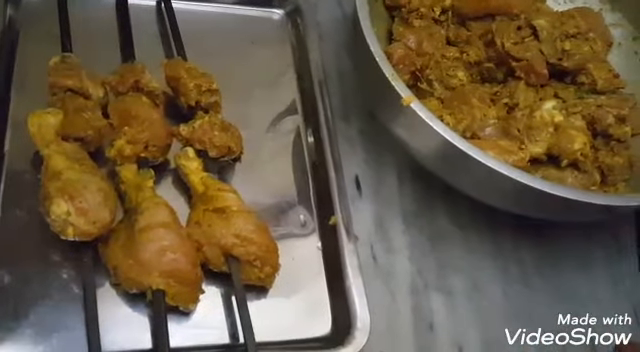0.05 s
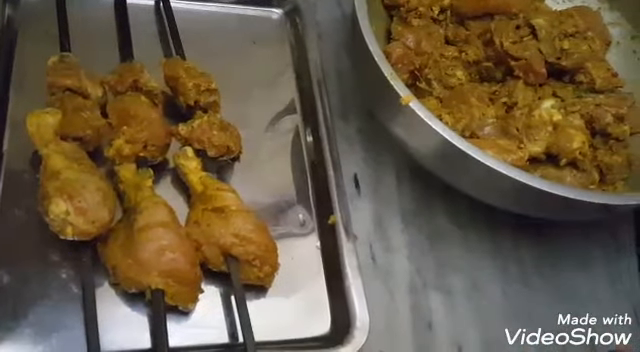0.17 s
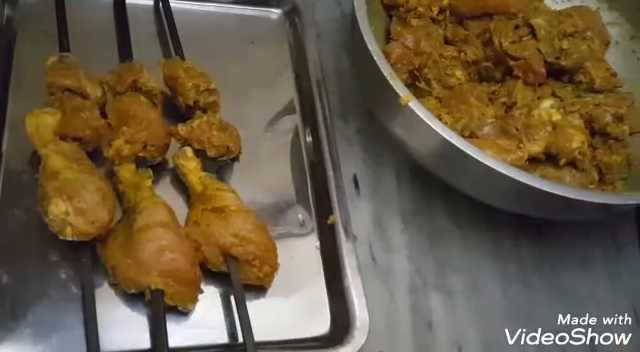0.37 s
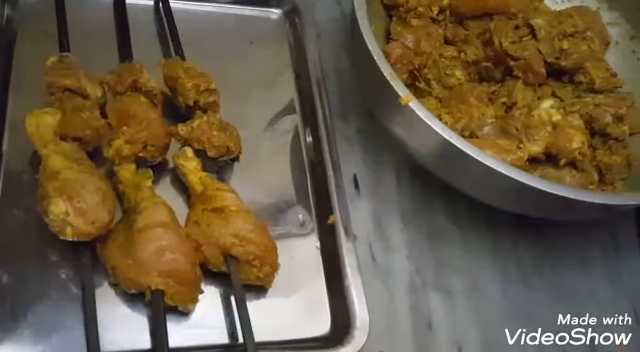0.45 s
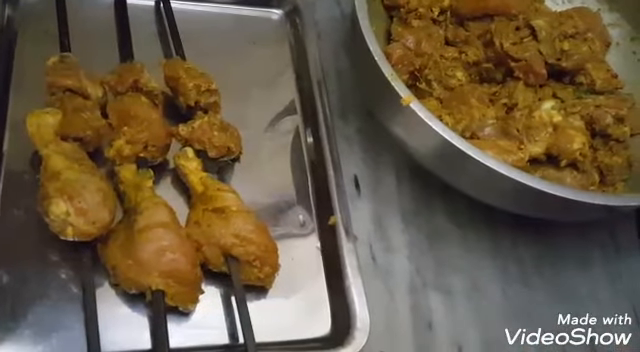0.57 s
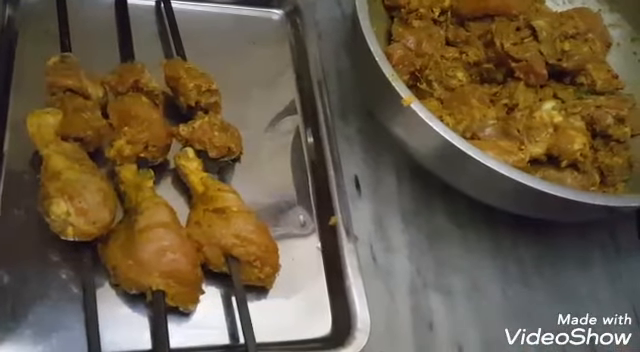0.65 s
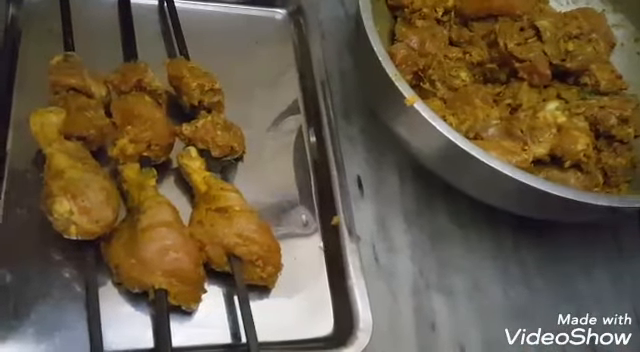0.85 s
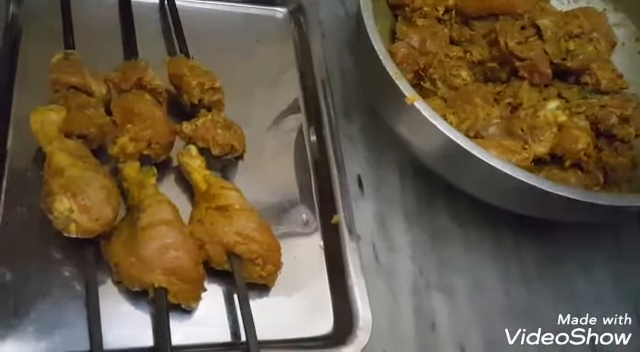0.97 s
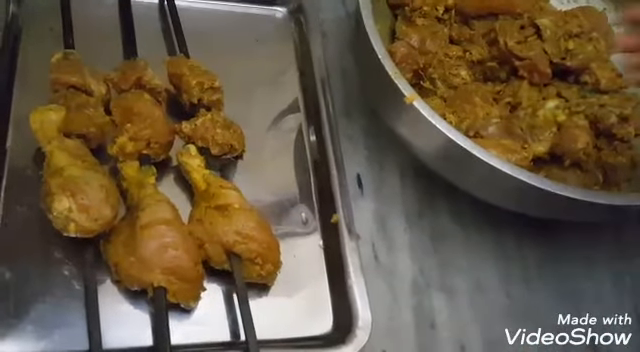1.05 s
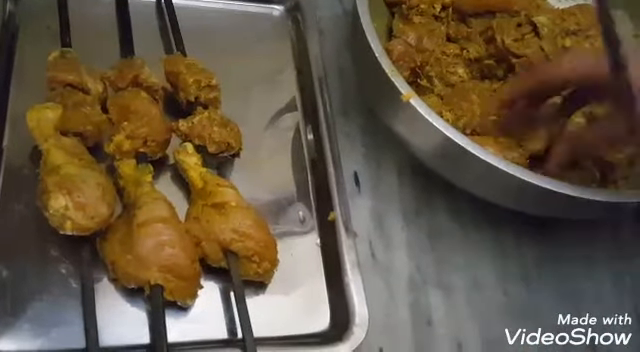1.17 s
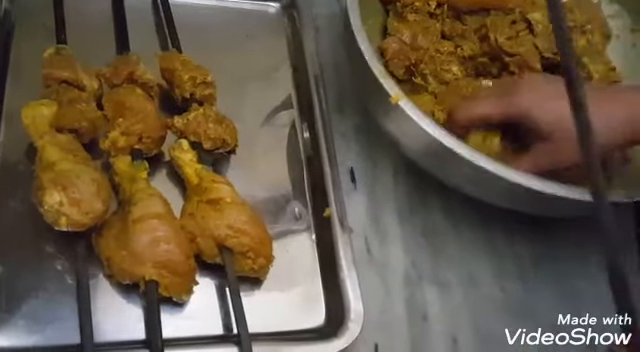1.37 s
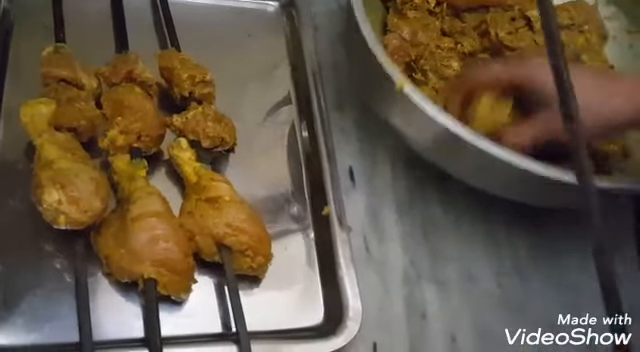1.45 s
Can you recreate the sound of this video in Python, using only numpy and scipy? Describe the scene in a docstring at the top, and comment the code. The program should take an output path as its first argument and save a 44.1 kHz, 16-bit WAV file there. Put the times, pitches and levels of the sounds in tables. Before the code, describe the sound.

Metal skewers scrape and clink in two quick ringing pairs, then a steel tray is bumped and knocked hard, rattling on the counter; a faint tick and soft wet rubbing follow, close-miked in a hard-walled kitchen.

```python
"""Steel skewers and a tray in a hard-walled kitchen

One skewer scrapes along the others and clinks in two quick pairs. A steel tray is bumped, which makes a loaded
skewer jump, then knocked hard so that it rattles on the counter. A skewer tip ticks, and a hand rubs and
squishes in a bowl of marinated meat over a faint hum. Steel is banks of decaying, wavering modes plus noise
washes; scraping and rubbing are shaped noise bursts; pushes into the counter are short low sines.
"""
import sys
import numpy as np
from scipy import signal
from scipy.fft import rfft, irfft, next_fast_len
from scipy.io import wavfile

SR = 44100
rng = np.random.default_rng(int(sys.argv[2]) if len(sys.argv) > 2 else 0)


def waveform_to_disk(signal):
    """Save audio, clipped to [-1, 1], as 16-bit WAV at the path in sys.argv[1]."""
    frames = np.transpose(np.atleast_2d(signal))
    scaled = np.clip(frames, -1, 1) * 32767
    samples = np.round(scaled).astype(np.int16)
    wavfile.write(sys.argv[1], SR, samples)


N = 66150

# likeness of left and right: f/Hz, correlation
LIKENESS = [(60, 0.83), (200, 0.98), (400, .8), (750, 0.74), (1300, -0.25), (2500, -0.077), (15000, .05)]
# ringing modes of the skewers: f/Hz, relative level/dB
SKEWER_MODES = [(3553, -45), (4517, -39.5), (5050, -50), (5448, -53), (5523, -48.5), (5577, -46),
                (5932, -56), (6320, -60), (6401, -62), (6589, -41.5), (6729, -37), (6885, -44), (7074, -58),
                (7795, -38.5), (7876, -40), (7951, -41), (8387, -51.5), (8635, -57), (9022, -35.5),
                (10137, -58), (10374, -42), (10998, -61.5), (11278, -57.5), (11741, -35.5), (12236, -46),
                (12543, -49.5), (13001, -61), (13216, -50), (13399, -37), (13534, -63.5), (13857, -44.5),
                (14745, -39.5), (14928, -51), (15235, -71)]
# stereo balance of the skewers: f/Hz, left minus right/dB
SKEWER_BALANCE = [(200, -0.5), (1000, -1), (2200, -3), (4500, -8), (6700, -2.5), (9000, 2.5), (14000, 0)]
# stereo balance of the tray, also used for tip and bowl: f/Hz, left minus right/dB
TRAY_BALANCE = [(150, -1.5), (700, 0.5), (1500, -2), (2100, -3.5), (4500, -7.5), (7000, -2), (10000, 3.5)]
# blows on the tray: t/s, body ring/dB, rim ring/dB, dull wash/dB, bright clatter/dB, crack/dB
TRAY_BLOWS = [(0.5680, -7, -25, -24.5, -36.5, -28.5), (0.6460, -3, 9.5, -28.5, -15.5, -14.5)]


def amp(db):
    """Amplitude factor of a level in dB."""
    return 10 ** (np.asarray(db) / 20)


def along(points, hz):
    """Read a curve of (f/Hz, value) points on a log frequency axis."""
    f, value = np.transpose(points)
    return np.interp(np.log(hz + 1), np.log(f + 1), value)


def clock():
    """Seconds at each sample."""
    return np.arange(N) / SR


def add(out, start, x):
    """Mix x into out from a start time in seconds."""
    i = int(np.clip(round(start * SR), 0, N - 1))
    out[:, i:] += x[:, :N - i]


def sides(balance, hz):
    """Left and right gains of constant power."""
    difference_db = along(balance, hz)
    gains = amp(np.array([difference_db, -difference_db]) / 2)
    return gains / np.sqrt(np.mean(gains ** 2, axis=0))


def stereo_angle(hz):
    """Mid/side mixing angle that gives left and right their likeness at each frequency."""
    return np.arccos(np.clip(along(LIKENESS, hz), -.99, .99)) / 2


def noise(spectrum, balance):
    """Coloured stereo noise of rms 1, with the likeness of left and right set by frequency."""
    hz = np.fft.rfftfreq(N, 1 / SR)
    angle = stereo_angle(hz)
    white = rfft(rng.standard_normal((2, N)))
    mid, side = white * amp(along(spectrum, hz)) * [np.cos(angle), np.sin(angle)]
    x = irfft(np.array([mid + side, mid - side]) * sides(balance, hz), N)
    return x / x.std()


def burst(spectrum, balance, rise, t60):
    """Noise that rises in a straight line (s), then falls 60 dB per t60 (s)."""
    t = clock()
    fall = amp(-60 * np.maximum(t - rise, 0) / t60)
    return noise(spectrum, balance) * np.minimum(t / rise, 1) * fall


def wash(spectrum, balance):
    """Countless close resonances of steel and room, as noise with each band dying at the room's rate."""
    # decay of the room: f/Hz, t60/s
    room_t60 = [(100, .52), (300, .47), (1800, .49), (5000, .44), (9000, .38), (14000, .3)]
    hz, t, bands = signal.stft(noise(spectrum, balance), SR, nperseg=512)
    decay = amp(-60 * t / along(room_t60, hz)[:, None])
    x = signal.istft(bands * decay, SR, nperseg=512)[1][:, :N]
    return x * (1 - np.exp(-clock() / 0.0035))  # soft onset


def ring(modes, strikes, decay, balance, rough, drift_hz, attack=.001):
    """Modes gain energy from each strike (t/s, level/dB); reflections make them waver differently left and right."""
    t = clock()
    out = np.zeros((2, N))
    feed = np.zeros((1, N))
    for start, db in strikes:
        add(feed, start, amp(2 * db) * np.exp(-t[None] / attack) / (attack * SR))
    for hz, db in modes:
        # energy adds up over the strikes and falls 60 dB per t60
        energy = signal.lfilter([1], [1, -amp(-120 / SR / along(decay, hz))], feed[0])
        angle = stereo_angle(hz)
        # independent random complex values, joined by straight lines, drift_hz knots a second
        knots = rng.standard_normal((2, 256)) + 1j * rng.standard_normal((2, 256))
        drift = [np.interp(t * drift_hz, np.arange(len(k)), k) for k in knots]
        apart = np.array([[1], [-1]]) * rng.choice([-1, 1])
        steady = np.exp(1j * angle * apart)
        waver = np.cos(angle) * drift[0] + apart * np.sin(angle) * drift[1]
        carrier = np.exp(2j * np.pi * (hz * t + rng.random()))
        tone = np.imag((steady + rough * waver) * carrier) / np.sqrt(.5 + rough ** 2)
        out += sides(balance, hz)[:, None] * tone * amp(db) * np.sqrt(np.abs(energy))
    return out


def sisters(modes, count):
    """Weaker modes scattered at random around each given one."""
    spread_hz, level_db = 85, -14
    hz, db = np.repeat(np.array(modes, float), count, axis=0).T
    off = rng.standard_normal((len(hz), 2))
    return np.column_stack([hz + spread_hz * off[:, 0], db + level_db + 2 * off[:, 1]])


def room():
    """Steady coloured air noise and a low hum of a few sines."""
    # partials of the hum: f/Hz, relative level/dB
    hum_partials = [(123.8, -62.5), (183.0, -60.5), (306.8, -66), (371.4, -65)]
    # colour of the air noise: f/Hz, relative density/dB
    air_colour = [(25, -3), (100, 5.5), (300, -0.5), (700, -7), (1500, -12.5), (4000, -25.5), (10000, -30),
                  (15000, -46)]
    air_db, hum_db = -58, -2.5
    hum = np.zeros(N)
    for hz, db in hum_partials:
        hum += amp(db) * np.sqrt(2) * np.sin(2 * np.pi * (hz * clock() + rng.random()))
    return amp(air_db) * noise(air_colour, [(1000, -1)]) + amp(hum_db) * hum


def skewers():
    """Sliding contact makes noise bursts; each strike excites the modes and a dense clang."""
    # sliding on steel: t/s, level/dB, rise/s, fall t60/s
    scrapes = [(0.028, -42, 0.0084, 0.55), (0.0514, -33, .003, 0.2), (0.115, -47, 0.0022, 0.4),
               (0.183, -42.5, .012, .3), (0.199, -35, 0.0047, .35)]
    # colour of the sliding: f/Hz, relative density/dB
    scrape_colour = [(59, -37), (100, -26.5), (210, -3), (308, -20.5), (452, -1.5), (662, -21), (991, 0.5),
                     (1390, -9), (1720, -7), (2040, -2.5), (3320, -14.5), (8640, -15), (10700, -24),
                     (11600, -19), (16000, -35.5)]
    # dry crunch at the first contact of each pair of clinks: t/s, level/dB, rise/s, fall t60/s
    crunches = [(0.2295, -22, 0.00089, .05), (0.272, -22, 0.0079, .05)]
    # colour of the crunch: f/Hz, relative density/dB
    crunch_colour = [(80, -10), (200, -1), (450, -0.5), (700, -6.5), (1300, -1), (2200, 5.5), (3200, -5),
                     (6000, -10.5), (15000, -24.5)]
    # skewer clinks: t/s, ring drive/dB, dense clang level/dB
    clinks = [(0.2294, 9, -19), (0.2396, 11.5, -29.5), (0.2726, -12, -18.5), (0.2848, 11.5, -25.5)]
    # decay of the ringing skewers: f/Hz, t60/s
    clink_t60 = [(3500, .48), (4500, 0.54), (5500, 0.5), (7000, 0.36), (9000, 0.32), (12000, 0.29),
                 (15000, 0.35)]
    # colour of the clang of skewers on steel: f/Hz, relative density/dB
    clang_colour = [(50, -7.5), (100, -21), (180, 3), (280, -6.5), (420, 2.5), (700, -6.5), (1200, -3.5),
                    (2100, 1.5), (3100, -3.5), (5900, -8), (6800, -2), (7300, -4), (7900, 2), (8400, -6.5),
                    (9100, 4.5), (9750, -19.5), (10500, -5), (11800, -7), (13600, -15), (15200, -22),
                    (15800, -45)]
    out = np.zeros((2, N))
    for start, db, rise, t60 in scrapes:
        add(out, start, amp(db) * burst(scrape_colour, SKEWER_BALANCE, rise, t60))
    for start, db, rise, t60 in crunches:
        add(out, start, amp(db) * burst(crunch_colour, SKEWER_BALANCE, rise, t60))
    for start, _, clang_db in clinks:
        add(out, start, amp(clang_db) * wash(clang_colour, SKEWER_BALANCE))
    strikes = [(start, db) for start, db, _ in clinks]
    out += ring(SKEWER_MODES, strikes, clink_t60, SKEWER_BALANCE, rough=0.94, drift_hz=45.74, attack=.0005)
    close_modes = sisters(SKEWER_MODES, count=3)
    out += ring(close_modes, strikes, clink_t60, SKEWER_BALANCE, rough=0.45, drift_hz=41.2)
    return out


def thump(hz, swell, t60):
    """A low push: a sine that swells with a time constant (s) and falls 60 dB per t60 (s)."""
    t = clock()
    envelope = (1 - np.exp(-t / swell)) ** 2 * amp(-60 * t / t60)
    return np.sin(2 * np.pi * hz * t) * envelope * np.ones((2, 1))


def soften(x, edge_hz):
    """A softer contact has less treble: a second-order low-pass."""
    return signal.sosfilt(signal.butter(2, min(edge_hz, SR / 3), fs=SR, output="sos"), x)


def tray():
    """Two blows ring body and rim; after the harder one, repeated contacts chatter on the counter."""
    # low pushes into the counter, the first under the clinks: t/s, level/dB, f/Hz, swell/s, t60/s
    thumps = [(0.234, -37.5, 70.5, .01, 0.097), (0.5674, -14, 179.3, 0.0015, 0.13),
              (0.57, -15, 266.5, 0.0018, 0.077), (0.6455, 12, 307, 0.0017, 0.013)]
    # chattering contacts: t/s, relative level/dB
    rattles = [(0.6557, -3.5), (0.6657, -0.5), (0.6721, 2.5), (0.6965, 1), (0.7034, 0), (0.7205, -3),
               (0.7349, -7.5), (0.751, -5), (0.7662, -10)]
    # colour of the dull wash: f/Hz, relative density/dB
    dull_colour = [(60, -31.5), (120, -3), (190, 0), (280, -10), (420, -16), (730, -17.5), (1050, -23),
                   (1500, -10), (2200, -24.5), (2800, -29), (4400, -29), (7000, -41.5), (12000, -44.5),
                   (15000, -62.5)]
    # colour of the bright clatter: f/Hz, relative density/dB
    clatter_colour = [(24, -84.5), (40, -52.5), (91, -28), (115, -4.5), (176, -1), (215, -16), (256, 2),
                      (503, -11), (715, -6), (1040, -13.5), (1300, -9.5), (1410, -22), (1550, -7.5),
                      (2000, -21.5), (2980, -27), (4030, -17), (5050, -26), (5720, -21.5), (8340, -24.5),
                      (13400, -46.5), (16000, -100.5)]
    # colour of the crack: f/Hz, relative density/dB
    crack_colour = [(200, -9), (1500, 10.5), (2800, -2), (4000, 0), (6000, 0.5), (9000, -4.5),
                    (10500, -13.5), (14500, -16), (16000, -33)]
    # ringing modes of the tray's body: f/Hz, relative level/dB
    body_modes = [(127, -39.5), (156, -53), (186, -28.5), (253, -40), (311, -40), (336, -34.5),
                  (377, -39.5), (465, -43), (612, -57.5), (675, -42.5), (698, -41.5), (738, -34.5),
                  (835, -39), (969, -45.5), (1502, -33.5), (1590, -38.5)]
    # ringing modes of its rim: f/Hz, relative level/dB
    rim_modes = [(1820, -48.5), (1846, -47), (2132, -50.5), (2315, -58.5), (2552, -59.5), (2670, -48.5),
                 (2837, -55.5), (3273, -47.5), (3644, -43), (3941, -41.5), (4091, -51.5), (4269, -44),
                 (4355, -52), (4474, -50), (4759, -58.5), (5281, -57.5), (5351, -62), (5722, -45),
                 (6810, -57), (7391, -57.5)]
    # decay of the tray: f/Hz, t60/s
    tray_t60 = [(130, 0.31), (350, 0.4), (1600, 0.48), (2700, 0.57), (4000, 0.2), (9000, 0.5)]
    # parts of each rattle, relative to its own level
    ring_db, rim_db, wash_db, tap_db, push_db = -0.5, 4, -21, -13, -7.5
    out = np.zeros((2, N))
    for start, _, _, dull_db, clatter_db, crack_db in TRAY_BLOWS:
        add(out, start, amp(dull_db) * wash(dull_colour, TRAY_BALANCE))
        add(out, start, amp(clatter_db) * wash(clatter_colour, TRAY_BALANCE))
        add(out, start, amp(crack_db) * burst(crack_colour, TRAY_BALANCE, rise=0.0046, t60=0.12))
    for start, db, hz, swell, t60 in thumps:
        add(out, start, amp(db) * thump(hz, swell, t60))
    for start, db in rattles:
        contact = amp(tap_db) * burst(clatter_colour, TRAY_BALANCE, rise=0.00087, t60=0.033)
        contact += amp(push_db) * thump(hz=247, swell=0.0025, t60=0.03)
        contact += amp(wash_db) * wash(clatter_colour, TRAY_BALANCE)
        add(out, start, amp(db) * soften(contact, edge_hz=4730))
    body_strikes = [(blow[0], blow[1]) for blow in TRAY_BLOWS]
    body_strikes += [(start, db + ring_db) for start, db in rattles]
    rim_strikes = [(blow[0], blow[2]) for blow in TRAY_BLOWS]
    rim_strikes += [(start, db + rim_db) for start, db in rattles]
    out += ring(body_modes, body_strikes, tray_t60, TRAY_BALANCE, rough=0.72, drift_hz=20, attack=0.0024)
    out += ring(rim_modes, rim_strikes, tray_t60, TRAY_BALANCE, rough=0.67, drift_hz=44.1)
    return out


def loaded_skewer():
    """The first bump makes a loaded skewer on the tray jump and ring in its own modes."""
    # ringing modes of the loaded skewer: f/Hz, relative level/dB
    loaded_modes = [(4457, -57.5), (5518, -60), (5938, -68), (6638, -54.5), (7079, -63.5), (7817, -76),
                    (8565, -71), (9103, -60), (10185, -69), (10637, -69), (11316, -75.5), (11832, -67.5),
                    (13334, -66), (13668, -71)]
    strikes = [(TRAY_BLOWS[0][0], 9.5)]
    decay = [(1500, 0.27), (12000, 0.37)]  # f/Hz, t60/s
    return ring(loaded_modes, strikes, decay, SKEWER_BALANCE, rough=0.17, drift_hz=64.8, attack=.0004)


def tip():
    """A light tick: bright modes, mostly damped at once by the fingers, and a faint after-ring of the skewers."""
    # ringing modes of the tip: f/Hz, relative level/dB
    tip_modes = [(1916, -71), (4468, -83), (5545, -72), (6169, -84), (6632, -55.5), (7822, -93),
                 (9012, -64.5), (9087, -79), (10422, -65), (10481, -96), (11450, -71), (11784, -67.5),
                 (12295, -92), (12505, -86), (13308, -58.5), (13523, -88), (14906, -75), (15525, -74)]
    # colour of the tick's noise: f/Hz, relative density/dB
    tick_colour = [(880, -45), (1500, -17.5), (1760, -10.5), (3620, -10.5), (4240, -17), (5600, -13),
                   (5880, -31), (6500, -13.5), (8080, -9.5), (8320, -29), (8830, -10), (12600, -9),
                   (13800, -3), (14200, -21), (16000, -18.5)]
    start = 1.0872  # s
    damped_db, after_db, others_db, noise_db = 17, 1, -28, -51
    # decays: f/Hz, t60/s
    damped_t60 = [(8000, 0.053)]
    after_t60 = [(6600, 0.26), (14000, 0.31)]
    others_t60 = [(4500, 0.47), (9000, 0.24)]
    out = ring(tip_modes, [(start, damped_db)], damped_t60, TRAY_BALANCE, rough=0.68, drift_hz=140.4)
    after_modes = np.vstack([tip_modes, sisters(tip_modes, count=1)])
    out += ring(after_modes, [(start, after_db)], after_t60, TRAY_BALANCE, rough=0.71, drift_hz=81)
    out += ring(SKEWER_MODES, [(start, others_db)], others_t60, SKEWER_BALANCE,
                rough=.6, drift_hz=53.1, attack=.008)
    add(out, start, amp(noise_db) * burst(tick_colour, SKEWER_BALANCE, rise=0.0012, t60=0.23))
    return out


def hand():
    """Dull rubs in the bowl are broad noise bursts; small wet clicks are short narrow ones with a wash."""
    # the hand in the bowl: t/s, level/dB, rise/s, fall t60/s
    rubs = [(1.292, -53, 0.00703, 0.41), (1.323, -55, .008, .2), (1.408, -58.5, 0.06, .8),
            (1.486, -48.5, 0.02, .4)]
    # colour of the rubbing: f/Hz, relative density/dB
    rub_colour = [(60, -10), (200, -3), (450, 0), (650, -9.5), (1100, -1.5), (1500, -12), (2200, -4),
                  (2900, -20.5), (7000, -22), (10000, -34), (15000, -35.5)]
    # wet clicks of the marinade: t/s, level/dB, centre f/Hz
    squishes = [(1.395, -57, 13500), (1.4187, -53.5, 6300)]
    out = np.zeros((2, N))
    for start, db, rise, t60 in rubs:
        add(out, start, amp(db) * burst(rub_colour, TRAY_BALANCE, rise, t60))
    for start, db, hz in squishes:
        band = [(hz / 2, -25), (hz, 0), (hz * 2, -35)]
        click = burst(band, TRAY_BALANCE, rise=.0015, t60=.02)
        click += amp(-13.5) * wash(band, TRAY_BALANCE)
        add(out, start, amp(db) * click)
    return out


def scene():
    """Everything on the counter, in the room."""
    return room() + skewers() + tray() + loaded_skewer() + tip() + hand()


def record(dry):
    """The recorder thins the deep bass and keeps nothing above its band limit."""
    low_cut_hz, top_hz = 72, 16000
    x = signal.sosfilt(signal.butter(2, low_cut_hz, "high", fs=SR, output="sos"), dry)
    padded = next_fast_len(N + SR // 2)
    kept = np.fft.rfftfreq(padded, 1 / SR) < top_hz
    return irfft(rfft(x, padded) * kept, padded)[:, :N]


dry = scene()
out = record(dry)
waveform_to_disk(out)
```